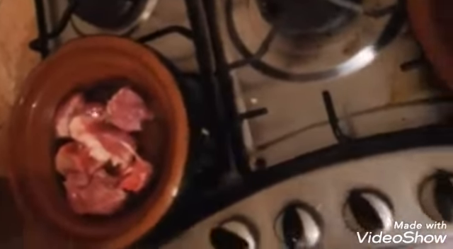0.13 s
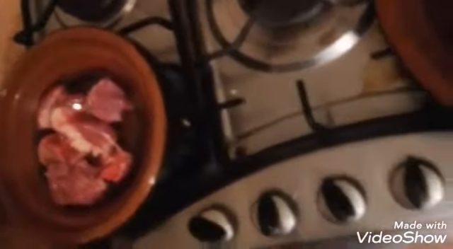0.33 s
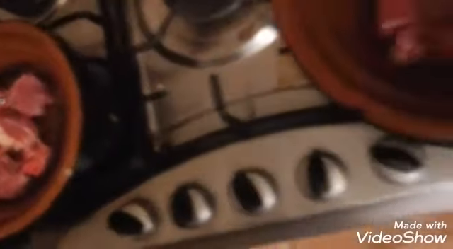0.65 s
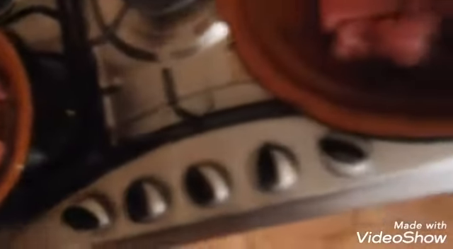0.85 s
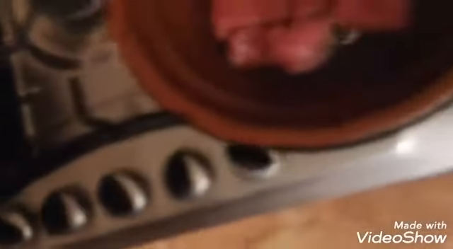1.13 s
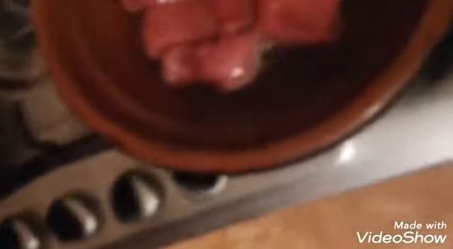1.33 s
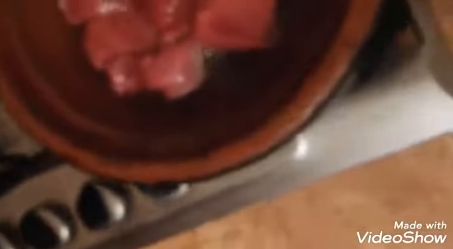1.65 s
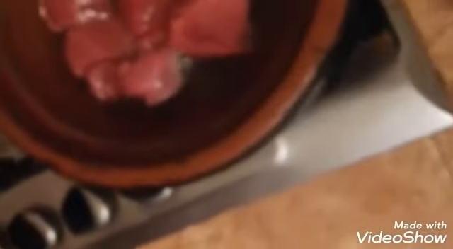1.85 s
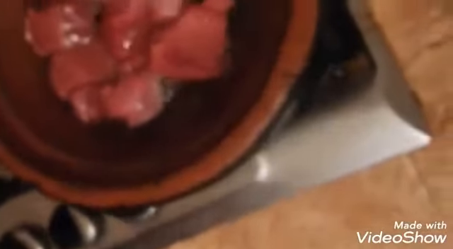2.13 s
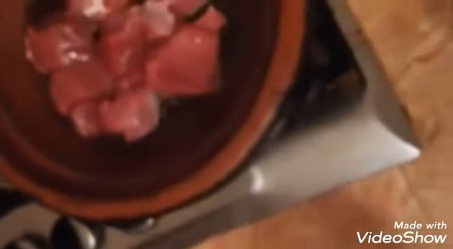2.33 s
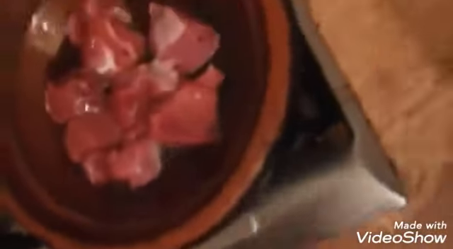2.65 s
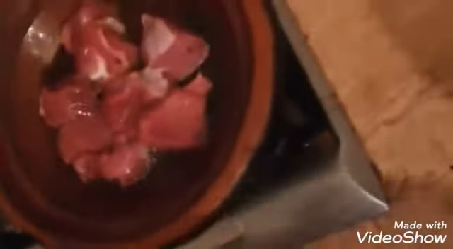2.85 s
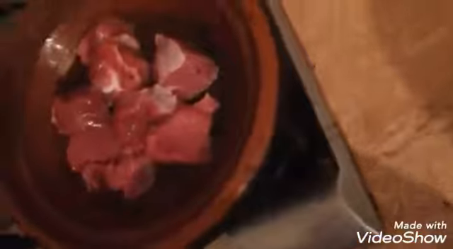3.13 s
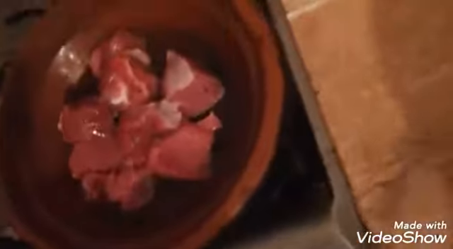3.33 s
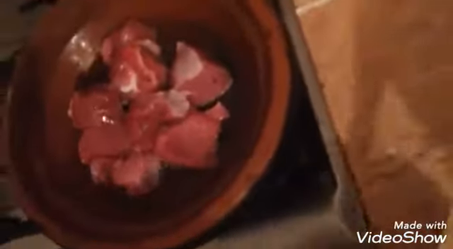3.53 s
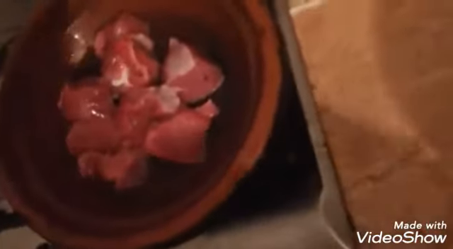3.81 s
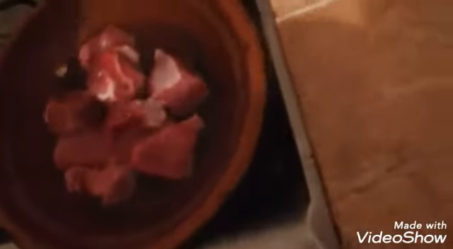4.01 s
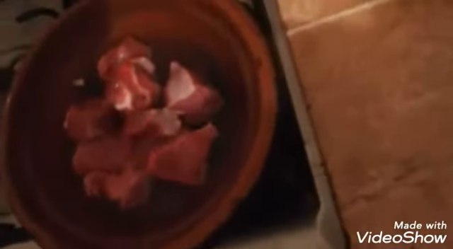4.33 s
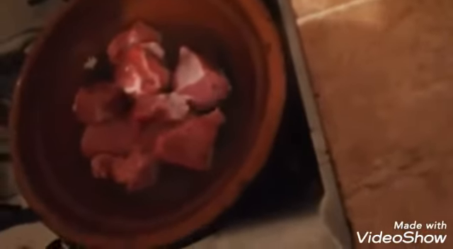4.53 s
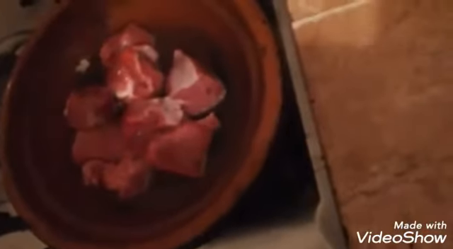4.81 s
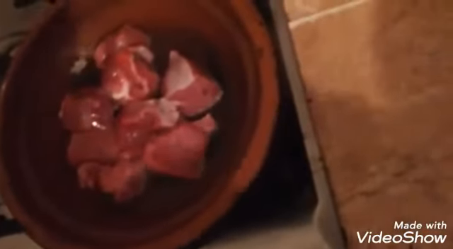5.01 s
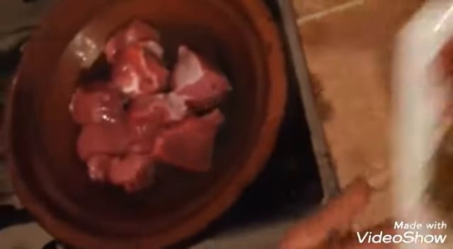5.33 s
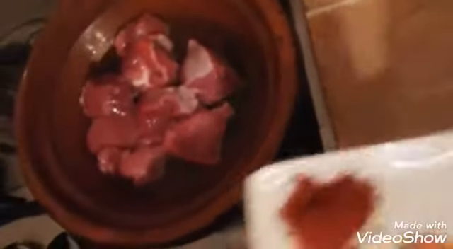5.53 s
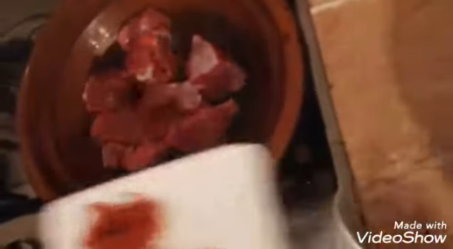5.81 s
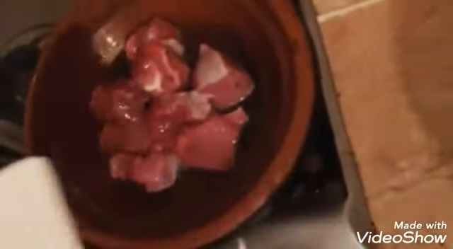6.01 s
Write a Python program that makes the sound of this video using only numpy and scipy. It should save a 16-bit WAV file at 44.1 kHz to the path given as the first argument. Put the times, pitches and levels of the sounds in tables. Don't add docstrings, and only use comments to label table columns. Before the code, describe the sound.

Meat sizzles and spits in a clay pot over a steady gas hiss, with dull knocks, sharp utensil clicks and a ringing dish.

```python
import sys
import numpy as np
from scipy import signal
from scipy.fft import rfft, irfft
from scipy.io import wavfile
from scipy.ndimage import uniform_filter1d

SR = 44100
rng = np.random.default_rng(int(sys.argv[2]) if len(sys.argv) > 2 else 0)


def digitize_waveform(pressure):
    field = np.atleast_2d(pressure).T
    bounded = np.clip(field, -1, 1)
    quanta = np.round(bounded * 32767).astype(np.int16)
    wavfile.write(sys.argv[1], SR, quanta)


def ratio(d):
    e = np.asarray(d, float) / 20
    return 10 ** e


N = 271777
TIME = np.arange(N) / SR

# [t/s, level/dB]
STOVE_LEVEL = [
    (0.0, -40),
    (2.16, -46.5),
    (3.86, -46.5),
    (4.53, -44.5),
    (5.49, -47.5),
    (6.0, -46.5),
    (6.16, -43.5),
]
# [f/Hz, level/dB per Hz]
FLAME_SPECTRUM = [(56, -45), (95, -15), (344, 2.5), (669, -1), (1030, 0.5), (1580, -5.5), (1790, 1.5),
                  (3000, -0.5), (4420, -1.5), (5590, -3), (13200, -7.5), (15000, -21), (16000, -56)]
# [f/Hz, level/dB]
SIZZLE_SPECTRUM = [(800, -23), (1800, -2), (2900, 2), (4200, 5.5), (6000, 8), (9000, -50), (14000, -17)]
# [f/Hz, width/Hz, level/dB]
POT_AIR = [(2990, 620, 2.5), (5260, 1900, 5), (1300, 360, 2), (10250, 1200, -2.5)]
# [f/Hz, level/dB per Hz]
RUMBLE_SPECTRUM = [(12, 12.5), (22, -19), (31, -20), (41, -9), (52, -4.5), (65, -17), (100, -26),
                   (140, -64)]
# [t/s, peak level/dB, half length/s]
MOTOR_SURGES = [(1.903, -67, 0.15), (2.993, -58, 0.081), (3.482, -70, 0.21), (3.842, -57, 0.022),
                (3.912, -53, 0.039), (4.41, -52, 0.034), (4.68, -54, 0.082), (4.848, -52, 0.065),
                (5.27, -60, 0.052), (5.516, -62.5, 0.25), (5.968, -60, 0.09)]
# [t/s, peak level/dB, dull above f/Hz, rise/s]
FAR_THUDS = [(0.0, -26, 1400, 0.00021), (0.19, -27.5, 1380, 0.006), (0.977, -35.5, 1300, 0.01),
             (1.44, -28, 1400, 0.0073), (1.54, -19, 1200, 0.0017), (1.73, -32, 960, 0.037),
             (3.251, -48, 684, 0.041), (4.36, -36.5, 1250, 0.013), (4.619, -34, 1180, 0.0044),
             (4.63, -44, 219, 0.011), (4.8, -34.5, 1060, 0.11), (5.69, -43, 1510, 0.02),
             (5.8, -46.5, 680, 0.011)]
# [f/Hz, level/dB per Hz]
CUPBOARD_SPECTRUM = [(53, -64), (90, -28), (134, -18.5), (193, -6.5), (226, -13), (419, 0.5), (460, -5),
                     (540, -2.5), (578, -2), (617, 1.5), (1030, -8.5), (1270, -3), (1660, -10.5),
                     (2200, -14.5), (2860, -61), (4840, -120)]
# [t/s, peak level/dB, f/Hz]
ROUND_SPITS = [(0.148, -21, 3070), (0.269, -20.5, 3000), (0.2884, -22, 2640), (0.4487, -23, 2700),
               (0.516, -27, 3180), (0.308, -22, 4700), (0.797, -31, 2800), (0.82, -26, 2600),
               (0.93, -26, 6380), (0.9715, -30, 2500), (1.0095, -37, 2980), (1.025, -30, 5700),
               (1.055, -26, 4700), (1.086, -27, 2770), (1.266, -35, 2900), (1.821, -25, 2820),
               (1.938, -28, 4510), (2.285, -28, 2900), (2.693, -32, 2900), (3.363, -24, 5290),
               (3.893, -32, 2640), (3.9415, -27, 2570), (4.281, -33, 3310), (5.37, -27, 3340),
               (0.5435, -18.5, 5540), (0.5903, -19.5, 2560), (5.4605, -28, 4000), (0.783, -23.5, 2910),
               (0.8465, -21, 2960), (0.9883, -20, 2800), (1.066, -26, 2800), (1.1406, -20, 3820),
               (1.15, -25, 2580), (1.634, -23, 4400), (1.78, -24, 2120), (3.5818, -30.5, 2570),
               (4.2403, -20, 4700), (4.2635, -22, 3400), (4.3065, -24, 3250), (5.1688, -24.5, 2950),
               (5.1904, -27, 3050), (5.254, -26, 3580), (5.3015, -24.5, 2930), (5.341, -27, 3300),
               (5.444, -29, 3200), (5.6434, -22.5, 2780), (5.939, -32, 3300), (6.0029, -17.5, 3050),
               (6.087, -17.5, 3480), (6.1502, -24, 2990)]
# [t/s, peak level/dB, f/Hz]
DRY_SNAPS = [(0.065, -26, 6500), (0.1268, -23, 5910), (0.227, -29, 5000), (0.3311, -23.5, 2440),
             (0.377, -28, 5000), (0.463, -34, 3500), (0.6439, -22.5, 2370), (0.6878, -22.5, 5750),
             (0.707, -32, 2980), (1.206, -46, 6200), (2.8525, -32, 7180), (3.1595, -33, 6030),
             (5.52, -40, 9000), (2.076, -37, 8000), (2.37, -33, 6000), (2.535, -29, 5000),
             (2.545, -33, 10000), (5.627, -34, 3730), (5.56, -34, 9000), (0.7444, -30.5, 2900),
             (1.3488, -29, 2570), (2.192, -37, 6300), (4.325, -27, 5900), (5.1155, -31, 5160),
             (5.4594, -47, 4100), (5.2815, -34, 1300), (5.287, -34, 2100), (5.512, -29, 6570),
             (5.515, -34, 1300), (5.827, -29, 6900)]
# [t/s, peak level/dB]
GRIP_LUMPS = [(0.1, -66), (0.52, -66), (0.66, -65), (0.89, -68), (1.98, -69), (3.995, -65), (4.36, -66),
              (4.62, -72), (5.51, -68), (5.85, -76)]
# [t/s, peak level/dB]
BOARD_RAP = [
    (0.1845, -13),
    (0.1915, -18),
]
# [f/Hz, level/dB, t60/s]
BOARD_MODES = [(430, -7.5, 0.058), (684, -4.5, 0.12), (943, 3.5, 0.061), (1200, 5, 0.023), (1370, 3, .03),
               (1600, -1, 0.019)]
# [t/s, level/dB, half length/s]
FAT_FLURRIES = [
    (0.297, -45.5, 0.056),
    (0.997, -49, 0.058),
    (1.837, -53, 0.22),
    (2.296, -48.5, 0.024),
    (2.9, -76, 0.081),
    (5.26, -53, 0.12),
    (6.07, -55, .1),
]
# [t/s, peak level/dB]
SHELF_TAPS = [
    (0.977, -26.5),
    (0.99, -29),
    (1.012, -51),
    (1.055, -35),
    (1.09, -36),
]
# [f/Hz, level/dB, t60/s]
SHELF_MODES = [(358, -1, 0.38), (432, 2, 0.13), (566, 2, 0.1), (620, -2, 0.35), (780, -7, 0.22),
               (1098, 2.5, 0.12), (1210, -18, .09), (1400, -18.5, 0.063)]
# [t/s, peak level/dB, f/Hz, length/s]
DAMPED_PINGS = [(1.433, -44, 2350, 0.043), (1.535, -44.5, 2550, 0.05), (1.544, -50, 2370, 0.089),
                (5.69, -53, 1472, 0.088), (1.0, -40, 633, 0.026), (5.767, -43, 365, 0.0135),
                (3.061, -50.5, 192, 0.07), (3.229, -49.5, 530, 0.12), (3.564, -51.5, 544, 0.038),
                (4.506, -37, 1600, 0.01), (4.6181, -16.5, 1670, 0.0046), (3.221, -39, 3300, .005),
                (3.308, -38, 5800, .003), (4.738, -21, 1610, 0.0076), (4.828, -41, 1560, 0.064),
                (4.9, -44.5, 1483, 0.056), (4.92, -47.5, 4750, 0.041)]
# [t/s, peak level/dB]
CUPBOARD_BLOWS = [
    (1.5258, -9),
    (1.5405, -10),
    (1.5505, -8),
    (1.58, -18),
    (1.597, -21),
]
# [f/Hz, level/dB, t60/s]
PANEL_MODES = [(185, -11, 0.15), (281, -10.5, 0.16), (365, -2, 0.31), (430, 3, 0.21), (502, -2, 0.26),
               (541, 1.5, 0.39), (616, 0, 0.26), (691, -3, 0.24), (752, -0.5, 0.22), (813, -15, 0.15),
               (875, -8.5, 0.28), (1108, -9, 0.54), (555, -2, 0.013), (1340, -14, 0.055)]
# [peak t/s, peak level/dB, swell/s, fade/s]
COUNTER_SCUFFS = [
    (3.074, -43, 0.052, 0.087),
    (3.25, -39.5, 0.046, 0.23),
    (3.586, -44, 0.027, 0.025),
    (5.72, -49, 0.13, 0.39),
]
# [f/Hz, width/Hz, level/dB]
COUNTER_BODY = [(485, 170, -1), (1300, 560, 6), (2010, 260, 6.5), (2600, 690, -3), (3660, 170, -0.5),
                (5100, 2100, -6.5)]
# [t/s, peak level/dB]
TOOL_DROP = [
    (3.232, -23.5),
    (3.2355, -23.5),
    (3.24, -30),
    (3.248, -29),
    (3.253, -33),
    (3.297, -36),
]
# [f/Hz, level/dB, t60/s]
LIGHT_TOOL_MODES = [(1400, 0.5, 0.023), (1970, -1, 0.04), (2670, 2, 0.022), (3400, -4.0, 0.027),
                    (4680, 5, 0.019), (5000, -3, .02), (5900, 0.5, .02)]
# [f/Hz, level/dB per Hz]
TOOL_CRACK = [(290, -27), (500, -21), (3440, 1), (3930, -29), (4610, -14), (10900, -12), (12000, -12),
              (15600, -53), (22000, -120)]
# [t/s, peak level/dB]
FIRST_CLICK = [
    (3.9926, -0.5),
    (3.9945, -7.5),
    (3.998, -17),
    (4.003, -20),
    (4.012, -27),
    (4.0497, -9),
    (4.052, -28),
]
# [f/Hz, level/dB, t60/s]
FIRST_CLICK_MODES = [(1080, -18, 0.019), (2830, -5.5, 0.009), (3180, -10.5, 0.017), (5290, -1, 0.012),
                     (5900, -14, 0.043), (6570, -14, 0.047), (3400, -22, .1), (9600, -5.5, 0.0084),
                     (13200, -15, 0.0076)]
# [f/Hz, level/dB per Hz]
FIRST_CRACK = [(180, -52), (300, -22), (526, -9.5), (781, -19), (1050, -3.5), (1700, -16), (2800, -8.5),
               (6460, -7), (13400, -22), (15500, -42)]
# [t/s, peak level/dB]
SECOND_CLICK = [
    (4.3505, -1),
    (4.35315, -2),
]
# [f/Hz, level/dB, t60/s]
SECOND_CLICK_MODES = [(2200, -16, .02), (3725, -10, .025), (3324, -17, .07), (6030, 2, .018),
                      (6045, -19, .11), (11400, -9, .009), (13200, -13, .007), (4555, 0, .018),
                      (4572, -8, .075), (5080, -17, .07), (1400, -20, .06), (9700, -16, .02)]
# [f/Hz, level/dB per Hz]
SECOND_CRACK = [(180, -37), (300, -10), (1260, -8.5), (1420, -11), (2980, -3.5), (4570, 7), (4880, -0.5),
                (12000, -9), (15500, -24)]
# [t/s, peak level/dB]
TIP_BOUNCE = [
    (4.3997, -12),
    (4.4028, -26),
]
# [f/Hz, level/dB, t60/s]
TIP_MODES = [(1420, -16, .04), (2250, -8, .02), (3390, -8, .05), (4572, -5, .06), (4230, -10, .04),
             (5500, -9, .015), (6100, -8, .012)]
# [t/s, peak level/dB, hardness/dB]
DISH_KNOCKS = [
    (4.506, -36, -14),
    (4.619, -7, -3),
    (4.622, -14, -12),
    (4.63435, -9, -1),
    (4.638, -14, -14),
    (4.643, -19, -12),
    (4.652, -26, -9),
    (4.661, -24, -21),
    (4.7375, -23, -6),
    (4.9, -33, -4),
]
# [f/Hz, level/dB, t60/s]
DISH_MODES = [(1366, -8, 0.07), (1725, -6, 0.11), (1808, -12, .15), (3838, -12, 0.08), (4780, -8, 0.3),
              (1496, -4, 0.27), (1557, 0, 0.3), (3328, -8.5, 0.5), (3406, -1, 0.4), (4680, -6, 0.6),
              (3170, -8, .07), (3020, -6, .05), (2900, -8, .05)]
# [f/Hz, level/dB per Hz]
DISH_CRACK = [(120, -52), (200, -27), (1130, -12.5), (1510, -7.5), (2260, -14.5), (3100, -8.5), (4250, -22),
              (4810, -19.5), (8000, -42), (10400, -67), (17600, -120)]
# [t/s, peak level/dB]
TRAY_BUMPS = [
    (5.686, -33),
    (5.703, -40),
    (5.7185, -31),
    (5.73, -36),
    (5.7595, -31.5),
    (5.797, -36),
    (5.812, -38),
]
# [f/Hz, level/dB, t60/s]
TRAY_MODES = [(365, 0.5, 0.09), (740, -6, .05), (1080, -8, .03), (1270, -2, 0.069), (1440, -3, .06),
              (1600, -4, .04)]
# [t/s, difference level/dB, from f/Hz, to f/Hz]
WIDE_BURSTS = [
    (0.337, -13, 100, 15500),
    (2.005, -8, 4500, 7000),
    (2.31, -6, 4200, 5270),
    (4.008, -21, 100, 14000),
    (5.605, -15, 100, 15000),
]


def noise(length):
    return rng.standard_normal(length)


def filtered(x, order, hz, kind="low"):
    return signal.sosfilt(signal.butter(order, hz, kind, fs=SR, output="sos"), x)


def rms_one(x):
    return x / np.sqrt(np.mean(x ** 2) + 1e-20)


def at_hz(points, hz):
    points_hz, level_db = np.transpose(points)
    return np.interp(np.log(hz), np.log(points_hz), level_db)


def coloured(x, points):
    hz = np.maximum(np.fft.rfftfreq(len(x), 1 / SR), 1)
    return rms_one(irfft(rfft(x) * ratio(at_hz(points, hz)), len(x)))


def drift(rate):
    r = np.exp(-80 * np.pi * rate / SR)
    slow = signal.lfilter([1], [1, -2 * r, r * r], noise(N // 40 + 2002))[2000:]
    return np.interp(np.arange(N) / 40, np.arange(len(slow)), rms_one(slow))


def random_clicks(per_s, spread_db, most):
    sizes = ratio(spread_db * np.minimum(rng.exponential(1, N), most)) * rng.choice([-1, 1], N)
    return sizes * (rng.random(N) < per_s / SR)


def ring(clicks, hz, t60):
    r = ratio(-60 / (t60 * SR))
    w = 2 * np.pi * hz / SR
    return signal.lfilter([0, np.sin(w)], [1, -2 * r * np.cos(w), r * r], clicks + 1e-18)


def band(x, hz, width_hz):
    r = np.exp(-np.pi * width_hz / SR)
    w = 2 * np.pi * hz / SR
    return signal.lfilter(np.array([1, 0, -1]) * (1 - r * r) / 2, [1, -2 * r * np.cos(w), r * r], x)


def add(out, s, sound):
    i = round(s * SR)
    out[i:i + len(sound)] += sound[:N - i]


def humps(rows):
    return sum(ratio(db) * np.exp(-((TIME - s) / half) ** 2) for s, db, half in rows)


def struck(hits, modes, colour, trim_db, spread_db, crack_db, crack_s, buzz_db, buzz_s, sign=-1):
    out, rows, t = np.zeros(N), np.array(hits), np.arange(SR // 4) / SR
    first_s = rows[0, 0]
    at = np.round((rows[:, 0] - first_s) * SR).astype(int)
    hardness_db = rows[:, 2:].sum(axis=1)
    chance = rng.standard_normal((len(at), len(modes)))
    for k, (hz, level_db, t60) in enumerate(modes):
        clicks = np.zeros(SR)
        bright_db = hardness_db * (hz > 2300)
        clicks[at] = ratio(rows[:, 1] + trim_db + level_db + spread_db * chance[:, k] + bright_db)
        add(out, first_s, ring(clicks, hz, t60) * sign ** k)
    dying = ratio(crack_db) * np.exp(-t / crack_s) + ratio(buzz_db) * np.exp(-t / buzz_s)
    dying *= 1 - np.exp(-t / 0.0009)
    for s, db in rows[:, :2]:
        add(out, s, ratio(db) * dying * coloured(noise(len(t)), colour))
    return out


def flame(hiss_db):
    hiss = coloured(noise(N), FLAME_SPECTRUM)
    top = filtered(hiss, 2, 5000, "high")
    flutter = ratio(1.6 * drift(18))
    return ratio(hiss_db + .8 * drift(5)) * (hiss - top + top * flutter)


def sizzle(sizzle_db):
    bursts_per_s = 1000 * ratio(5.0 * drift(14))
    bursts = random_clicks(bursts_per_s, spread_db=3.0, most=3.0)
    dealt = rng.integers(0, 12, N)
    grains = np.zeros(N)
    for k, hz in enumerate(np.geomspace(900, 12000, 12)):
        grains += ratio(at_hz(SIZZLE_SPECTRUM, hz)) * ring(bursts * (dealt == k), hz, 12.3 / hz)
    hollow = sum(ratio(db) * rms_one(band(bursts, hz, width)) for hz, width, db in POT_AIR)
    return ratio(sizzle_db) * rms_one(rms_one(grains) + ratio(4.0) * rms_one(hollow))


def crackle(swing_db):
    ticks = random_clicks(180 * ratio(6.0 * drift(9)), spread_db=4.9, most=2.5)
    burst = noise(40) * np.exp(-np.arange(40) / 8)
    ticks = filtered(np.convolve(ticks, burst)[:N] + 1e-18, 2, 2400, "high")
    return ratio(-50 + swing_db) * ticks


def rumble():
    return ratio(-65.5 + 2.0 * drift(4.5)) * coloured(noise(N), RUMBLE_SPECTRUM)


def hum():
    cycles = np.cumsum(336 + 4.3 * drift(10.0)) / SR
    level = ratio(-66) + humps(MOTOR_SURGES)
    return level * ratio(3 * drift(14)) * np.sin(2 * np.pi * cycles)


def thuds():
    out, t = np.zeros(N), np.arange(SR) / SR
    for s, db, dull_hz, rise_s in FAR_THUDS:
        body = rms_one(filtered(coloured(noise(SR), CUPBOARD_SPECTRUM), 4, dull_hz))
        t60_s = 0.62 if dull_hz > 400 else 0.42
        swell = 1 - np.exp(-t / max(rise_s, 1e-4))
        add(out, s, ratio(db - 4.5) * body * swell * ratio(-60 * t / t60_s))
    return out


def spits():
    out, click = np.zeros(N), np.r_[1., np.zeros(700)]
    t = np.arange(len(click)) / SR
    swell = 1.01 * (1 - np.exp(-t / 0.00041))
    ring_cycles, twin_share = 26.6, 0.51
    for rows, tick_db, tick_s in ((ROUND_SPITS, -5.5, .0015), (DRY_SNAPS, 11, .0004)):
        for s, db, hz in rows:
            tick = band(noise(len(click)) * np.exp(-t / tick_s), 3600, width_hz=12300)
            tick = 0.65 * tick / np.abs(tick).max()
            t60_s = ring_cycles / hz
            twin = ring(click, hz * rng.uniform(0.792, 1.284), t60_s)
            bubble = swell * (ring(click, hz, t60_s) - twin_share * twin)
            add(out, s, ratio(db - 4.0) * (bubble + ratio(tick_db) * tick))
    return out


def handling():
    low = rms_one(filtered(noise(N), 2, [25, 120], "band"))
    return low * humps([(s, db, 0.031) for s, db in GRIP_LUMPS])


def rap():
    return struck(BOARD_RAP, BOARD_MODES, CUPBOARD_SPECTRUM, trim_db=-10.5, spread_db=3.0,
                  crack_db=-9.0, crack_s=0.0018, buzz_db=-19.5, buzz_s=0.019)


def flurries():
    pops = random_clicks(350.0, spread_db=8.7, most=3)
    mouth = band(band(pops + 1e-18, 2800, width_hz=1200), 2800, width_hz=1200)
    return rms_one(mouth) * humps(FAT_FLURRIES)


def taps():
    return struck(SHELF_TAPS, SHELF_MODES, CUPBOARD_SPECTRUM, trim_db=-14.5, spread_db=1.0,
                  crack_db=-24, crack_s=0.0018, buzz_db=-34, buzz_s=0.033)


def pings():
    out = np.zeros(N)
    for s, db, hz, length_s in DAMPED_PINGS:
        t = np.arange(round(1.3 * length_s * SR)) / SR
        rubbed = rms_one(band(band(noise(len(t)), hz, width_hz=50), hz, width_hz=50))
        tone = np.sin(2 * np.pi * hz * t) if length_s < .02 else .7 * rubbed
        swell = np.sin(np.pi * (t / t[-1]) ** .6) ** 0.4
        add(out, s, ratio(db) * tone * swell)
    return out


def thumps():
    thump = struck(CUPBOARD_BLOWS, PANEL_MODES, CUPBOARD_SPECTRUM, trim_db=-17.5, spread_db=1.5,
                   crack_db=-17, crack_s=0.0016, buzz_db=-26.0, buzz_s=0.029, sign=0.98)
    return filtered(thump, 2, [150, 1900], "band")


def scuffs():
    grit = random_clicks(4000.0, spread_db=5.8, most=2.5)
    body = np.zeros(N)
    for k, (hz, width, db) in enumerate(COUNTER_BODY):
        body += ratio(db) * band(grit, hz, width) * (-1) ** k
    level = np.zeros(N)
    for s, db, swell_s, fade_s in COUNTER_SCUFFS:
        away = np.maximum((s - TIME) / swell_s, (TIME - s) / fade_s)
        level += ratio(db - 20.5 * away)
    return rms_one(body) * level


def rattle():
    return struck(TOOL_DROP, LIGHT_TOOL_MODES, TOOL_CRACK, trim_db=-9.0, spread_db=0.0,
                  crack_db=-12.0, crack_s=0.0051, buzz_db=-23.0, buzz_s=0.043)


def utensil():
    out = struck(FIRST_CLICK, FIRST_CLICK_MODES, FIRST_CRACK, trim_db=-7.0, spread_db=1.5,
                 crack_db=-6, crack_s=0.0012, buzz_db=-31.5, buzz_s=0.068)
    out += struck(SECOND_CLICK, SECOND_CLICK_MODES, SECOND_CRACK, trim_db=-9.5, spread_db=1.5,
                  crack_db=-8.5, crack_s=0.0022, buzz_db=-28.0, buzz_s=0.049)
    out += struck(TIP_BOUNCE, TIP_MODES, TOOL_CRACK, trim_db=-4.5, spread_db=2.0,
                  crack_db=-9.0, crack_s=0.0022, buzz_db=-23.0, buzz_s=0.029)
    return out


def dish():
    settled = np.clip((TIME - 4.75) / .02, 0, 1)
    resting = ratio(-3 * settled + 2.5 * drift(30))
    return resting * struck(DISH_KNOCKS, DISH_MODES, DISH_CRACK, trim_db=-19, spread_db=1.5,
                            crack_db=-9, crack_s=0.005, buzz_db=-30, buzz_s=0.11)


def tray():
    return struck(TRAY_BUMPS, TRAY_MODES, CUPBOARD_SPECTRUM, trim_db=-11.5, spread_db=2.5,
                  crack_db=-14.0, crack_s=0.0016, buzz_db=-25.0, buzz_s=.015, sign=0.88)


def kitchen(x):
    t60_s, wall_cut_hz = .36, 2200
    t = np.arange(SR // 2) / SR
    echoes = noise(len(t)) * (1 - np.exp(-t / 0.0014))
    dull = filtered(echoes, 1, wall_cut_hz)
    response = dull * ratio(-60 * t / t60_s) + (echoes - dull) * ratio(-60 * t / (0.018 * t60_s))
    return signal.fftconvolve(x, response / np.sqrt(np.sum(response ** 2)))[:N]


def scene():
    stove_db = np.interp(TIME, *np.transpose(STOVE_LEVEL))
    swing_db = stove_db - stove_db.mean()
    near = spits() + rap() + flurries() + taps() + pings() + thumps()
    near += scuffs() + rattle() + utensil() + dish() + tray()
    events = near + ratio(-17) * kitchen(near) + sizzle(-49 + swing_db) + thuds()
    events = filtered(events, 4, 125, "high")
    hiss_db = -47 + 0.76 * swing_db
    mono = events + flame(hiss_db) + crackle(swing_db) + rumble() + hum() + handling()
    return np.array([mono, mono])


def thinned(x, under_db, tilt_db, floor_db, masking):
    hz, _, cells = signal.stft(x, SR, nperseg=2048)
    power = np.abs(cells) ** 2
    bands_db = 10 * np.log10(uniform_filter1d(power, size=5, axis=0) + 1e-20)
    usual_db = np.median(bands_db, axis=1)
    mid_db = 10 * np.log10(power[(hz > 1300) & (hz < 4000)].sum(axis=0) + 1e-20)
    rise_db = masking * np.maximum(mid_db - np.median(mid_db) - 3.5, 0)
    octaves = np.log2(np.maximum(hz, 1) / 10000)
    limit_db = np.maximum(usual_db - under_db + tilt_db * octaves, floor_db)
    keep = (bands_db > limit_db[:, None] + rise_db) | (hz < 6500)[:, None]
    return signal.istft(cells * keep, SR, nperseg=2048)[1][:N]


def difference(mono):
    out, t = np.zeros(N), np.arange(2048) / SR
    specks_per_s = 22
    for when, pitch, db in rng.random((round(specks_per_s * N / SR), 3)):
        speck = np.hanning(len(t)) * np.sin(2 * np.pi * (170 + 12000 * pitch ** 3) * t)
        add(out, when * N / SR, ratio(-71.5 + 8 * db) * speck)
    for s, db, low_hz, high_hz in WIDE_BURSTS:
        gate = np.exp(-((TIME - s) / 0.016) ** 4)
        flips = rng.choice([-1, 1], N // 8 + 1).repeat(8)[:N]
        out += ratio(db) * filtered(gate * mono * flips + 1e-12, 4, [low_hz, high_hz], "band")
    return out


def band_limit(x):
    return signal.sosfilt(signal.butter(12, 16480, fs=SR, output="sos"), x)


def record(dry):
    top_cut = signal.cheby2(6, 40, 17500, fs=SR, output="sos")
    mono = signal.sosfilt(top_cut, np.clip(dry[0], -.98, .98))
    mono = thinned(mono, under_db=4.3, tilt_db=3.5, floor_db=-89, masking=.33)
    mix = mono + difference(mono) * [[1], [-1]]
    return band_limit(mix)


dry = scene()
out = record(dry)
digitize_waveform(out)
```